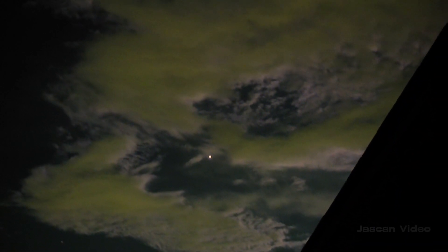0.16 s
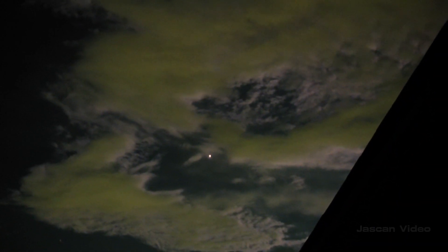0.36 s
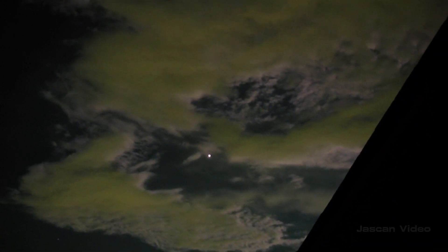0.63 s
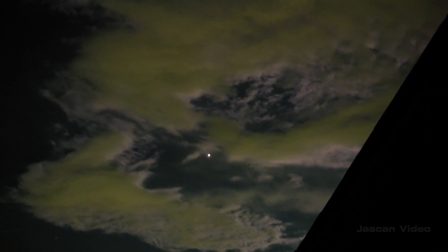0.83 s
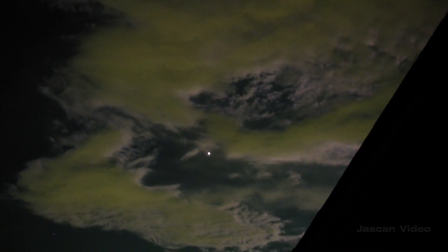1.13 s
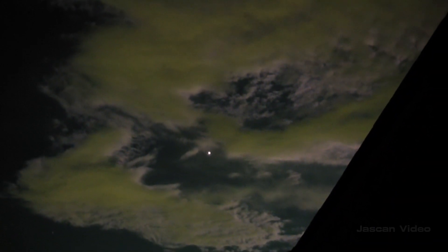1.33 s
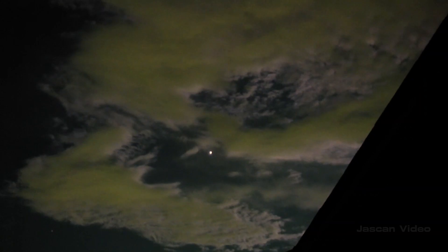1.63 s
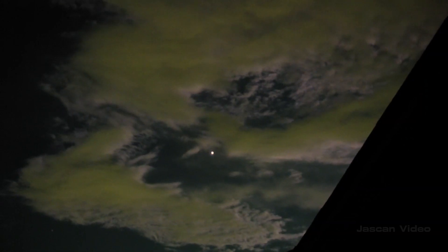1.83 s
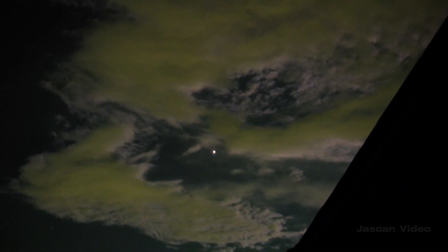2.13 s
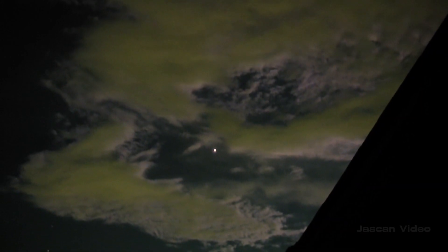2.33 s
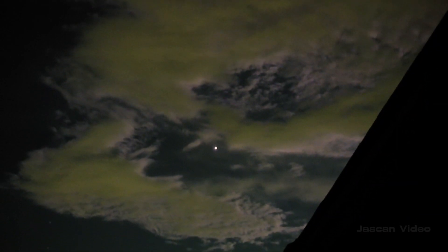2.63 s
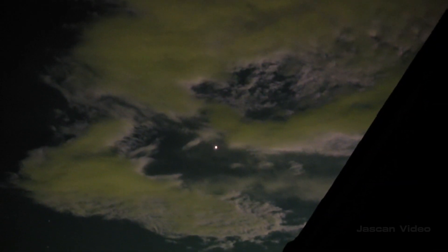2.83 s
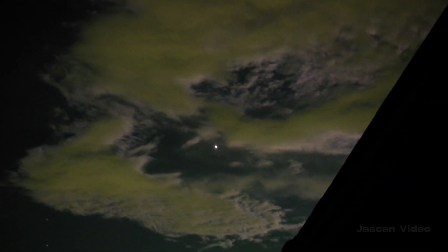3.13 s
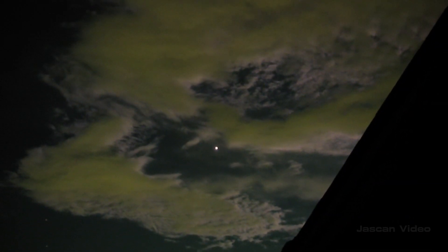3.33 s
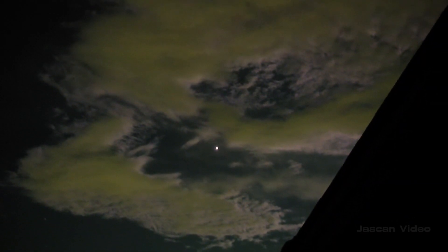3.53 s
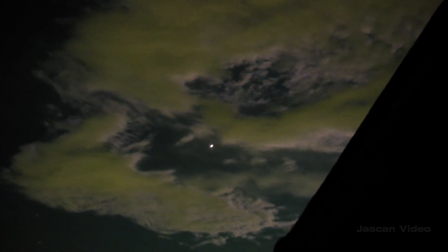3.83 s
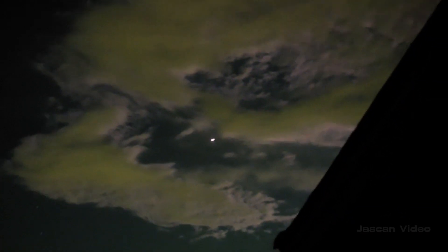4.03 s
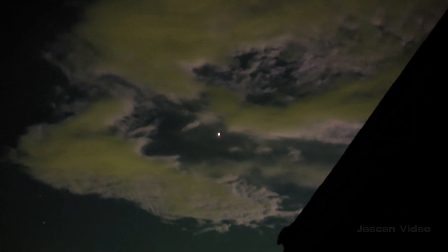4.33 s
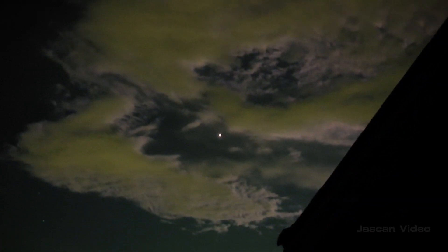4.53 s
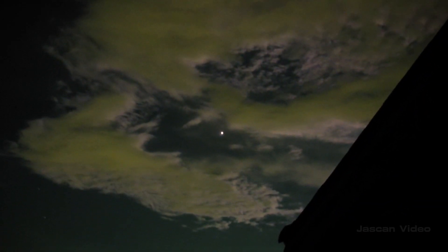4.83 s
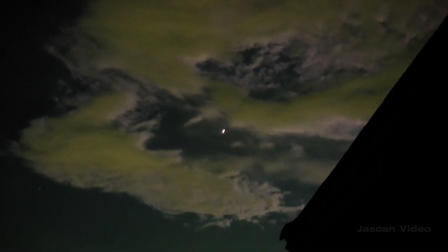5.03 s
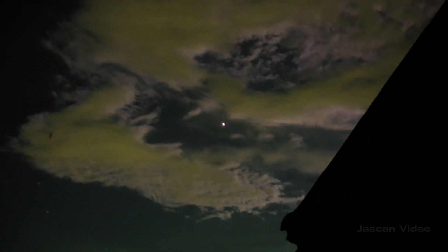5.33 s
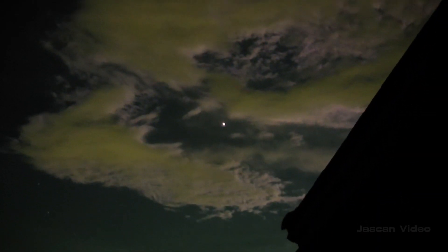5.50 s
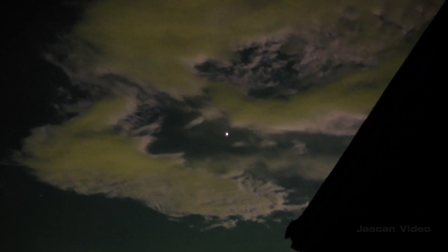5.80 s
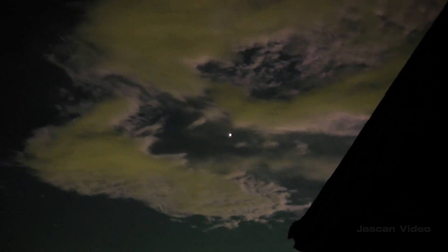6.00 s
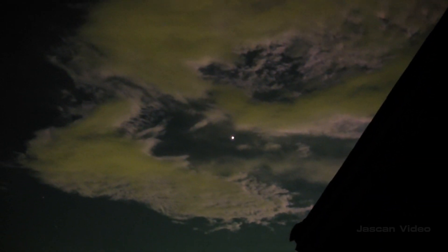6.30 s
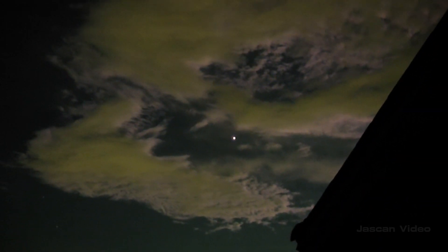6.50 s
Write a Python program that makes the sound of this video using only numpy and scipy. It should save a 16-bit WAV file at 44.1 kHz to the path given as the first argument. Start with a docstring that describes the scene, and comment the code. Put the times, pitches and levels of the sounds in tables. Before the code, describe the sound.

Lawn sprinklers spray water with a steady, high, finely sputtering hiss, a little to the left of a hand-held microphone in a quiet outdoor spot. A faint low machine hum and a very faint thin tone sit underneath. Just past halfway, something knocks once on the microphone, close on the right. Near the end the grip gives a faint low bump while the hiss carries on.

```python
"""Lawn sprinklers at dusk

Water jets tear into droplets and hiss steadily, off to the left of a hand-held camera.
Mains-driven machines hum and throb faintly in the quiet air, under a thin 1 kHz tone.
Something knocks softly on the camera by its right microphone; later the grip bumps faintly."""
import sys
import numpy as np
from scipy import signal
from scipy.fft import rfft, irfft
from scipy.io import wavfile

SR = 44100
rng = np.random.default_rng(int(sys.argv[2]) if len(sys.argv) > 2 else 0)


def output_pcm(signal):
    """Save a mono or channel-first signal as 16-bit PCM at the path in sys.argv[1].

    Samples are clipped to [-1, 1] before scaling.
    """
    pcm = np.clip(np.atleast_2d(signal).T, -1, 1) * 32767
    wavfile.write(sys.argv[1], SR, np.round(pcm).astype(np.int16))


N = 293378
TIME = np.arange(N) / SR
FRAME, HOP = 1024, 256  # length and spacing of short slices of sound, in samples
SLICE_HZ = np.fft.rfftfreq(FRAME, 1 / SR)


def gain_of(db):
    """Turn decibels into a number to multiply by."""
    return 10 ** (np.asarray(db) / 20)


def curve_at(points, hz):
    """Join a table's points into a curve, giving each octave equal room."""
    f, value = np.transpose(points)
    return np.interp(np.log(hz + 1), np.log(f + 1), value)


def hump(hz, width):
    """A steep hill of sound power, 1 at its centre frequency."""
    return 1 / (1 + ((SLICE_HZ - hz) / width) ** 2) ** 3


def wander(rate_hz):
    """A smooth random wobble of about size 1, mostly slower than the given rate."""
    f = np.fft.rfftfreq(N, 1 / SR)
    keep_slow = np.exp(-(f / rate_hz) ** 2) * (f > 0)
    wobble = irfft(rfft(rng.standard_normal(N)) * keep_slow, N)
    return wobble / wobble.std()


def noise_pair(likeness, left, right):
    """Make two noises partly alike; return slice times and spectra (side, frequency, slice)."""
    noises = np.array([left, right]) * np.sqrt(SR / 2)  # 0 dB per Hz
    t, _spectra = signal.stft(noises, SR, nperseg=FRAME, noverlap=FRAME - HOP)[1:]
    shared, separate = _spectra
    likeness = np.clip(likeness, 0, 1)[:, None]
    return t, np.array([shared, likeness * shared + np.sqrt(1 - likeness ** 2) * separate])


def sound_of(spectra):
    """Join the slices back into sound."""
    return signal.istft(spectra, nperseg=FRAME, noverlap=FRAME - HOP)[1][:, :N]


# Humps in the hiss at the left and right microphones: f/Hz, width/Hz, level/dB per Hz
LEFT_HUMPS = [(2410, 624, -79), (3700, 790, -72.5), (4100, 375, -56.5), (5226, 340, -48),
              (5990, 400, -58.5), (6970, 660, -66), (7450, 220, -68), (8000, 780, -77.5), (9400, 420, -75),
              (10260, 1100, -84), (12355, 861, -100), (14226, 1520, -101.4)]
RIGHT_HUMPS = [(2490, 340, -68.5), (3805, 270, -60), (4045, 565, -62), (5360, 574, -53), (5910, 620, -56),
               (6800, 360, -62.5), (8350, 580, -76.5), (9190, 380, -73), (10200, 590, -74.5),
               (11190, 350, -82), (12440, 1462, -90.7), (13979, 2087, -98.5)]
# How alike the hiss is on the two sides: f/Hz, likeness (0 to 1)
HISS_LIKENESS = [(2600, 0.86), (3150, 0.57), (3700, 0.56), (4350, 0.98), (4720, 0.9), (4900, 0.95),
                 (5420, 0.94), (5620, 0.04), (5950, 1), (6580, 0.12), (6900, 0.9), (7500, 0.1),
                 (10400, 0.77), (14000, .35)]
# How far the right side trails the left: f/Hz, lag/cycles
RIGHT_LAG = [(2000, 0), (2800, .5), (3600, 1.5), (4520, 2.5), (4750, 2.86), (5400, 3.04), (5630, 3.5),
             (6000, 4), (7330, 5.5), (8300, 6), (9200, 7.25), (9900, 7.1), (10800, 7.38), (14000, 7.1)]


def sprinklers(level_db=0.13, sputter_db=0.38, flutter_db=0.34, echo_gain=0.2, echo_s=0.0082):
    """Jets tear into countless droplets: a sputtering hiss, with a weak echo off a near wall."""
    jets = rng.standard_normal((2, N))
    echo = echo_gain * np.roll(jets, round(echo_s * SR), axis=1)
    jets = (jets + echo) / np.sqrt(1 + echo_gain ** 2)
    t, spectra = noise_pair(curve_at(HISS_LIKENESS, SLICE_HZ), *jets)
    for side, humps in enumerate([LEFT_HUMPS, RIGHT_HUMPS]):
        power = sum(gain_of(db) ** 2 * hump(hz, width) for hz, width, db in humps)
        spectra[side] *= np.sqrt(power)[:, None]
    lag_cycles = np.interp(SLICE_HZ, *np.transpose(RIGHT_LAG))
    spectra[1] *= np.exp(-2j * np.pi * lag_cycles)[:, None]
    spectra *= gain_of(camera_sway_db(t))
    flicker_db = sputter_db * wander(rate_hz=55) + flutter_db * wander(rate_hz=22)
    return sound_of(spectra) * gain_of(level_db + flicker_db)


# How the hiss shifts as the camera sways: t/s, main shift/dB, extra shift on the right/dB
SWAY_SHIFTS = [(0.0, 1.3, -0.5), (0.4, 0, 0.6), (1.3, 1, 2.0), (2.8, 0.1, 3), (3.55, -0.7, 1.3),
               (3.85, 0.7, -4), (4.03, -2.2, 3), (4.25, -0.2, -4.7), (4.95, -3.5, 3), (5.84, 0.6, -3.5),
               (6.35, 0.7, -8), (6.65, 1, -4.4)]
# Humps that follow the main shift: f/Hz, width/Hz, left multiplier, right multiplier
SWAYING_HUMPS = [(2500, 360, 1.6, 1.2), (4100, 440, 0.8, 0.063), (5240, 810, 0.7, 2), (6900, 460, 1.9, 1.6),
                 (10200, 1000, 1, 1.3)]


def camera_sway_db(t, valley_fill=0.52, extra_hz=6230, extra_width_hz=650):
    """Echoes add up differently as the camera moves: when humps sink, the valleys between fill."""
    times, *shifts = np.transpose(SWAY_SHIFTS)
    main_db, extra_db = (np.interp(t, times, shift) for shift in shifts)
    follow = sum(np.outer([left, right], hump(hz, width)) for hz, width, left, right in SWAYING_HUMPS)
    shift_db = (follow - valley_fill)[:, :, None] * main_db
    shift_db[1] += np.outer(hump(extra_hz, extra_width_hz), extra_db)
    return shift_db


# The quiet outdoor background: f/Hz, level/dB per Hz
AIR_LEVELS = [(20, -100), (45, -88), (90, -83), (200, -82.5), (330, -84), (750, -88), (1100, -82.5),
              (1500, -86.5), (1900, -78.5), (2400, -82.5), (3200, -100.5), (6000, -110)]


def quiet_air():
    """Far surroundings blur into a dull, even wash, nearly alike on both sides."""
    likeness = curve_at([(500, 0.81), (1000, 1.0)], SLICE_HZ)
    _, spectra = noise_pair(likeness, *rng.standard_normal((2, N)))
    return sound_of(spectra * gain_of(curve_at(AIR_LEVELS, SLICE_HZ))[:, None])


# Machines humming at nearly one pitch: f/Hz above the hum, level/dB
MACHINE_TONES = [(0, -58), (0.535, -64.4), (2.79, -74)]


def machine_hum(hum_hz=117.25, in_step_s=1.05, octave_db=-51.5, waver_db=0.95, left_db=0.8):
    """Close low tones move in and out of step, so they throb, under a tone an octave higher."""
    phase = 2 * np.pi * hum_hz * TIME
    throb = np.zeros(N)
    for above_hz, db in MACHINE_TONES:
        lead = 2 * np.pi * above_hz * (TIME - in_step_s)
        drift = 0.1 * wander(rate_hz=1.7)
        throb += gain_of(db) * np.sin(phase + lead + drift)
    octave = gain_of(octave_db + waver_db * wander(rate_hz=4.1)) * np.sin(2 * phase)
    return np.sqrt(2) * (throb + octave) * gain_of([[left_db], [-left_db]])


def thin_tone(hz=1001, level_db=-64.5, slips_per_s=3):
    """A faint tone that now and then slips to another point in its wave."""
    slip_now = rng.random(N) < slips_per_s / SR
    slips = np.cumsum(slip_now * rng.uniform(-np.pi, np.pi, N))
    return np.sqrt(2) * gain_of(level_db) * np.sin(2 * np.pi * hz * TIME + slips)


def soft_hit(tones, start_s, level_db, rise_s, left_db):
    """A soft push makes part of the camera ring very briefly."""
    t = np.maximum(TIME - start_s, 0)
    ring = sum(gain_of(db) * np.exp(-np.log(1000) * t / fade_s) * np.sin(2 * np.pi * hz * t)
               for hz, db, fade_s in tones)
    rise = 1 - np.exp(-(t / rise_s) ** 2)
    return ring * rise * gain_of(level_db) * gain_of([[left_db], [0]])


# Ringing tones of the camera body: f/Hz, relative level/dB, time to fade by 60 dB/s
BODY_TONES = [(600, -2.5, 0.024), (875, -12, 0.019), (1200, -10, 0.018), (1640, 3.5, .013),
              (1820, 1, 0.015)]


def body_knock():
    """Something knocks on the camera body, close to the right microphone."""
    return soft_hit(BODY_TONES, start_s=3.7696, level_db=-9, rise_s=0.0044, left_db=-24)


# Ringing tones of the grip: f/Hz, relative level/dB, time to fade by 60 dB/s
GRIP_TONES = [(130, 0, .04), (240, 3, 0.03), (560, -6, 0.032)]


def grip_bump():
    """A soft bump on the grip gives a faint, low thud."""
    return soft_hit(GRIP_TONES, start_s=5.968, level_db=-33, rise_s=0.0027, left_db=-5)


def scene():
    """Add the steady sounds, the knock and the bump, left and right."""
    return sprinklers() + quiet_air() + machine_hum() + thin_tone() + body_knock() + grip_bump()


def record(dry, notch_hz=7740, notch_width_hz=90, top_hz=15700):
    """The camera cuts a narrow notch in the treble, then removes the very highest sounds."""
    f = np.fft.rfftfreq(N, 1 / SR)
    offset = (f - notch_hz) / notch_width_hz
    notched = irfft(rfft(dry) * 1j * offset / (1 + 1j * offset), N)
    low_pass = signal.firwin(511, top_hz, window=("kaiser", 9), fs=SR)
    return signal.oaconvolve(notched, low_pass[None], "same")


dry = scene()
out = record(dry)
output_pcm(out)
```